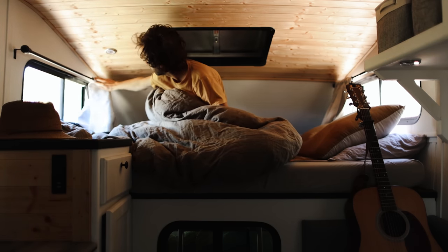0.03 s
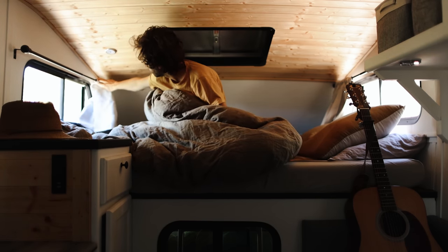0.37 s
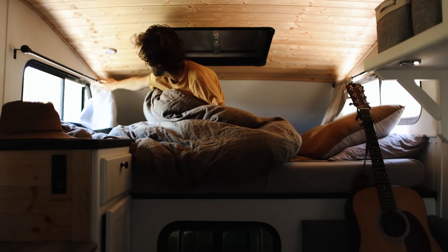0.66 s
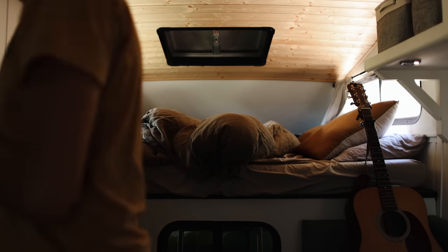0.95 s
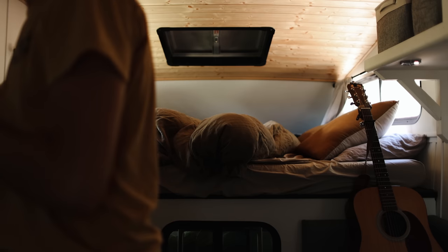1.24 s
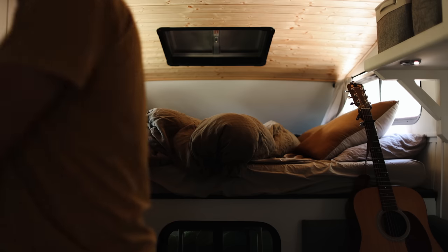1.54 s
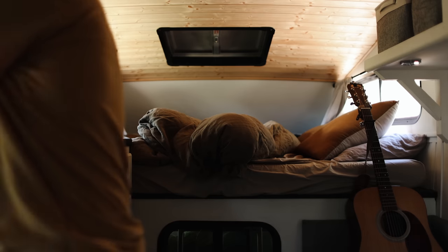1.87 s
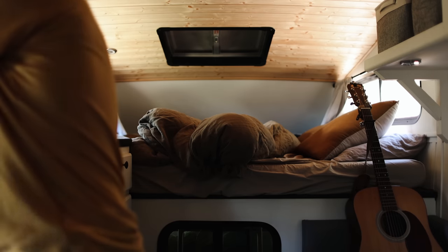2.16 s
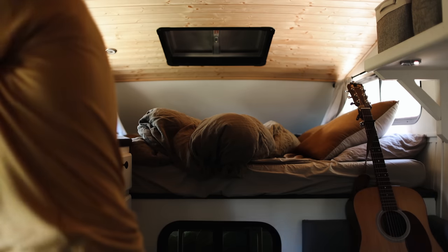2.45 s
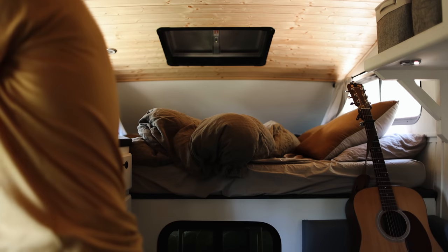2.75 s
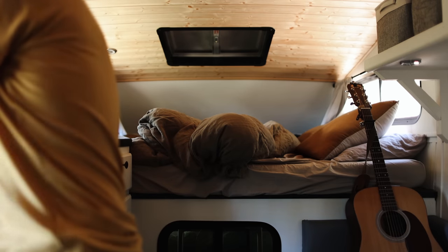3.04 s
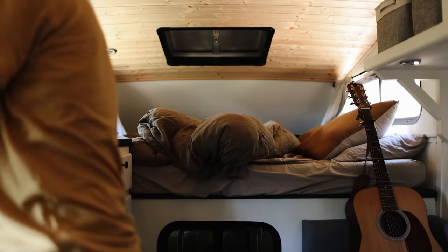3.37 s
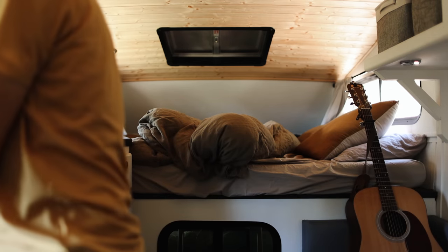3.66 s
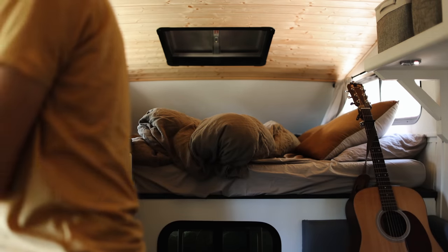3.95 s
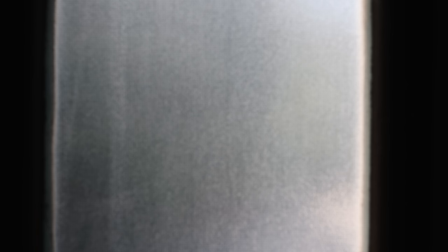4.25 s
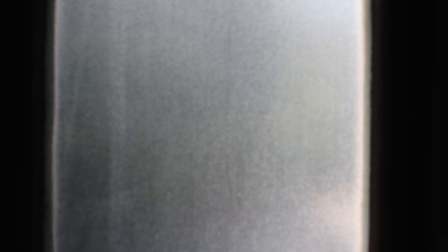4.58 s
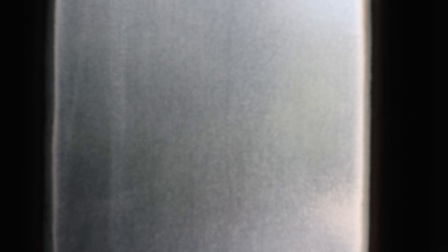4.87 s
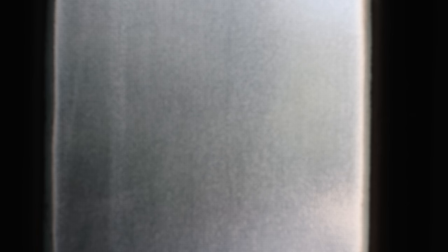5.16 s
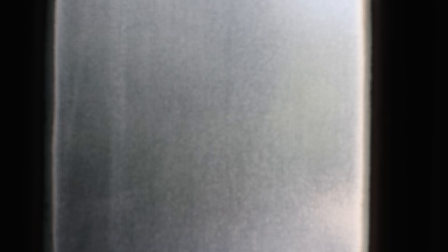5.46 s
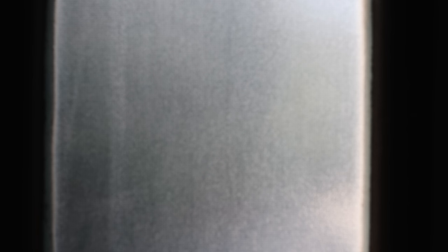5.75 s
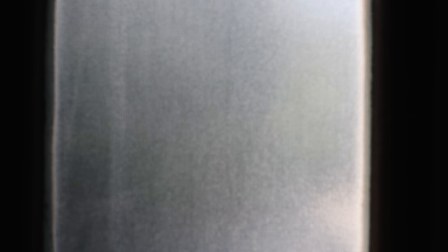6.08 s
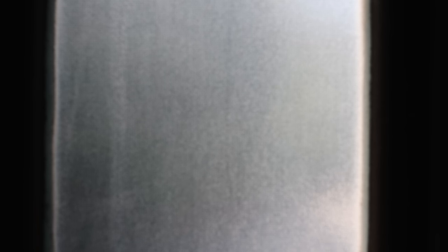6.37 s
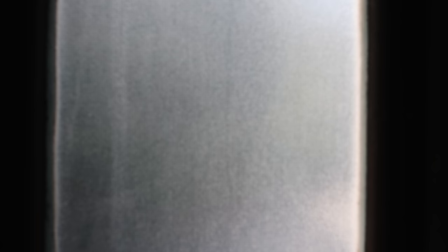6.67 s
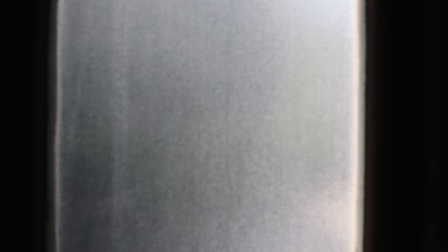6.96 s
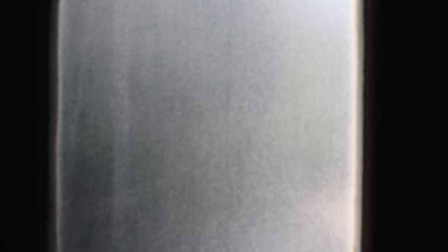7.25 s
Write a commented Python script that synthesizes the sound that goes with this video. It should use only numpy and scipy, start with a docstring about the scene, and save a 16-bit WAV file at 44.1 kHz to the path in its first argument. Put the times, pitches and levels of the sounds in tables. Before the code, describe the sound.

Close by in a small wooden camper, a duvet swishes over a sheet and the bed base thumps softly. A curtain is then hauled along its rail in a run of tugs, the cloth hissing and the gliders scraping, squeaking and knocking against the wall. After a short pause, a door latch is worked several times, clicking and rubbing. Very faint birds sing far outside over quiet cabin air.

```python
"""A curtain is hauled along its rail in a run of tugs, close by in a small wooden camper: the cloth
hisses, the gliders scrape, chirp as they stick and slip, and knock against the wall panel.
Before it, someone shifts in bed: the duvet swishes over the sheet and the bed base thumps softly.
In the quiet afterwards a door latch is worked several times, clicking and rubbing.
Small birds sing far outside, over faint cabin air."""
import sys
import numpy as np
from scipy import signal
from scipy.fft import rfft, irfft, next_fast_len
from scipy.io import wavfile

SR = 44100
rng = np.random.default_rng(int(sys.argv[2]) if len(sys.argv) > 2 else 0)


def wav_out(sig):
    """Save sig, one row per channel (or a flat mono array), as 16-bit PCM at SR to the path in sys.argv[1]."""
    wavfile.write(sys.argv[1], SR, np.round(np.clip(np.atleast_2d(sig).T, -1, 1) * 32767).astype(np.int16))


N = 331632
TIME = np.arange(N) / SR
DUVET_END_S, CURTAIN_END_S = 0.763, 4.308
CUTOFF_HZ = 15800

# tugs: (start [s], end [s], rail scrape [dB], cloth hiss [dB], treble share [dB])
TUGS = [(1.088, 1.174, -65, -66, -18), (1.474, 1.497, -29.5, -51, -24), (1.613, 1.664, -33.5, -53, -10.5),
        (1.711, 1.788, -29.5, -32, -12), (1.83, 1.96, -28, -36, -4), (2.01, 2.213, -33.5, -45, -12),
        (2.075, 2.086, -39, -77.5, -1), (2.216, 2.311, -41.5, -50.5, -13), (2.376, 2.453, -40.5, -48, -14),
        (2.455, 2.508, -30.5, -45, -8.5), (2.674, 2.882, -29.5, -38, -11.5),
        (3.085, 3.176, -27, -39.5, -11), (3.4, 3.444, -38, -52, -5.5), (3.47, 3.816, -33, -41.5, -10.5),
        (3.977, 4.024, -44.5, -66.5, -27)]
# wall shudder as the curtain hits its stop: (start [s], end [s], level [dB])
STOP_SHUDDER = [(3.82, 4.02, -37)]
# wall and mattress rumble, rail scrape, cloth hiss, snapping folds: (frequency [Hz], level [dB])
RUMBLE_SPECTRUM = [(15, -50.5), (25, -15), (37, -2.5), (50, -6), (75, -0.5), (107, 0.5), (139, -3.5),
                   (243, -2), (280, -0.5), (360, -28.5), (620, -120)]
SCRAPE_SPECTRUM = [(130, -29), (220, -4.5), (250, -8), (280, 0), (320, -7.5), (368, 0), (493, -13.5),
                   (595, 2), (660, -11), (786, -0.5), (850, -5.5), (913, -4), (1070, -8), (1220, -8),
                   (1400, -9.5), (3200, -25), (4160, -54.5), (7040, -120)]
CLOTH_SPECTRUM = [(1290, -30.5), (2200, -10.5), (3140, -7.5), (4070, -1.5), (4420, -2.5), (4840, -1.5),
                  (7390, -9), (8580, -11), (12800, -29), (14500, -37.5), (16000, -47.5)]
FOLD_SPECTRUM = [(500, -15), (1100, -0.5), (2200, -1.5), (4500, -1), (8000, -6.5), (12800, -26),
                 (16000, -49)]


def curtain(rise_db_per_s=320.5, coast_db_per_s=264.5, wall_fall_db_per_s=166.5):
    """Each tug scrapes the gliders along the rail and shakes the wall; cloth hisses, folds snap."""
    start, end, scrape_db, hiss_db, treble_db = np.transpose(TUGS)
    rail_gain = strokes(zip(start, end, scrape_db), rise_db_per_s, coast_db_per_s)
    cloth_gain = strokes(zip(start, end, hiss_db), rise_db_per_s, coast_db_per_s)
    wall_gain = strokes(zip(start, end, scrape_db - 2.5), rise_db_per_s, wall_fall_db_per_s)
    stop_gain = strokes(STOP_SHUDDER, rise_db_per_s, wall_fall_db_per_s)
    rumble = np.hypot(wall_gain, stop_gain) * friction(RUMBLE_SPECTRUM, 3000, 4.4, 2.0)
    scrape = rail_gain * near_walls(friction(SCRAPE_SPECTRUM, 4000, 0.86, 1.4), echo_db=-10)
    cloth = near_walls(friction(CLOTH_SPECTRUM, 9000, 2.8, 2.1))
    hiss = cloth_gain * brighten(cloth, np.interp(TIME, (start + end) / 2, treble_db))
    folds = from_db(-1) * cloth_gain * near_walls(friction(FOLD_SPECTRUM, 90, 1, 0.98), echo_db=-5)
    return (rumble + scrape + hiss + folds + glider_chirps()) * between(DUVET_END_S, CURTAIN_END_S)


# runs along the rail: (start [s], end [s], slip rate [1/s], relative level [dB])
GLIDER_RUNS = [(2.085, 2.205, 52, -43), (2.24, 2.425, 28, -44.5), (2.44, 2.515, 50, -43.5),
               (2.63, 2.69, 40, -44), (2.695, 2.915, 60, -37.5), (2.94, 3.045, 26, -47),
               (3.055, 3.205, 48, -38), (3.248, 3.26, 40, -45), (3.39, 3.47, 45, -43),
               (3.48, 3.80, 50, -39.5)]


def glider_chirps(low_hz=3850, high_hz=5950, catch_hz=3800, catch_db=-4.5, spread_db=1.8, jitter=.1):
    """Stick-slip: a rising squeak as a glider lets go, a lower blip as it catches again."""
    out = np.zeros(N)
    for start, end, slips_per_s, db in GLIDER_RUNS:
        for due_s in np.arange(start, end, 1 / slips_per_s):
            late, size, pitch, wait, grip = rng.standard_normal(5)
            slip_s = due_s + jitter * late / slips_per_s
            catch_s = slip_s + (.6 + jitter * wait) / slips_per_s
            detune = 1 + .03 * pitch
            slip = squeak(low_hz * detune, high_hz * detune, length_s=.0028)
            catch = squeak(catch_hz * detune, 1.07 * catch_hz * detune, length_s=.004)
            add(out, slip_s, from_db(db + spread_db * size) * slip)
            add(out, catch_s, from_db(db + catch_db + spread_db * grip) * catch)
    return 3 * np.std(out) * near_walls(rms_one(out), echo_db=-6)


def squeak(low_hz, high_hz, length_s):
    """One tiny upward sine sweep."""
    progress = np.linspace(0, 1, round(length_s * SR))
    hz = low_hz + (high_hz - low_hz) * progress
    envelope = np.sqrt(np.sin(np.pi * progress).clip(0))
    return envelope * np.sin(2 * np.pi * np.cumsum(hz) / SR)


# knocks: (time [s], level [dB], tilt [dB/octave], cut-off [Hz], spot resonance [Hz], spot gain [dB])
GLIDER_KNOCKS = [(1.4083, -43, 2, 5900, 900, -19), (1.437, -44.5, 6, 12300, 900, -13),
                 (1.4579, -33, 5, 6500, 895, -14), (1.5434, -29, -0.5, 12100, 463, 7),
                 (1.691, -29.5, 4, 11000, 3980, 0.5), (1.707, -31.5, 2.5, 8000, 2280, -8),
                 (1.802, -23.5, 5, 6730, 4030, 0), (1.912, -28, 6.5, 8100, 2250, 3),
                 (1.9746, -21.5, 3.5, 11000, 2180, 2), (2.0607, -25, -1.5, 2400, 620, 11.5),
                 (2.4428, -46, 8, 8000, 470, -6), (2.5802, -32.5, 2, 10000, 766, 8.5),
                 (2.645, -20.5, -2, 2013, 464, 6), (2.653, -21, 2, 2500, 905, 9.5),
                 (2.7294, -21, 1.5, 2400, 1200, 5.5), (2.798, -26, -1.5, 3980, 905, 10.5),
                 (2.8995, -16, 0.8, 3630, 463, -4.5), (2.9065, -18.5, -1.5, 2210, 765, 6),
                 (3.0284, -31, -3.5, 5016, 296, -3.5), (3.171, -25.5, 0.5, 1800, 930, 7),
                 (3.2731, -13.5, 0.4, 3850, 925, 3), (3.3518, -34, 0.5, 5000, 905, 4),
                 (3.471, -38, 5, 3000, 1260, -3), (3.506, -39, 5, 2910, 1270, -1.5),
                 (3.6647, -18, 1.5, 2300, 970, -4.5), (3.788, -25.5, -4, 1800, 765, 3),
                 (3.8088, -12.5, 8, 2460, 1300, 0.5), (3.8175, -16, 3.5, 2340, 1740, 4),
                 (3.9021, -37.5, 6, 2800, 1450, 8), (3.984, -36.5, 1, 2210, 1280, 4)]
# wall panel: (frequency [Hz], level [dB], t60 [s])
WALL_MODES = [(88.9, -16.5, 0.12), (157, 2.5, 0.25), (287.3, 1, 0.11), (467, 8, 0.11), (585, -8.5, 0.06),
              (743, 8, 0.054), (780, -8.5, 0.045), (924, 7.5, 0.068), (1280, 2.5, 0.1), (1481, -4.5, 0.091),
              (1676, -4.5, 0.13), (1750, -8, 0.044), (1949, -15, 0.12), (2280, -10.5, 0.04),
              (3900, -11.5, 0.12), (4500, -21, .12)]
# contact on the panel: (frequency [Hz], level [dB])
WALL_CONTACT_SPECTRUM = [(60, 0.5), (150, 1), (900, 5), (1600, 1), (2800, -11), (4300, -8.5), (7000, -16),
                         (9000, -15), (15000, -32)]


def glider_knocks():
    """Gliders knock on the rail and ring the wall panel."""
    return hard_blows(GLIDER_KNOCKS, WALL_CONTACT_SPECTRUM, WALL_MODES,
                      spot_q=11, chatter_s=0.013, cabin_db=-1, ring_db=-2.5)


# clicks: (time [s], level [dB], tilt [dB/octave], cut-off [Hz], spot resonance [Hz], spot gain [dB])
LATCH_CLICKS = [(5.1067, -22, 3, 5200, 525, 11), (5.2673, -51.5, -7.5, 2495, 1100, 15),
                (5.5245, -50, 1, 2194, 548, -2), (5.5633, -40.5, 2.5, 2750, 1090, -4),
                (5.579, -44, 0, 2390, 1080, 25), (5.6093, -29.5, 1.5, 4020, 1100, 0),
                (5.7558, -40, -6.5, 4960, 634, 3.5), (5.783, -48.5, -5, 6050, 548, -7),
                (5.799, -63, 5, 6000, 1630, -12), (5.82, -42.5, -6.5, 3970, 548, -0.5),
                (5.8685, -48, 5.5, 5920, 2410, -6.5), (5.88, -48.5, 8.5, 4000, 2690, 0.5),
                (5.9163, -16.5, 6, 3260, 1484, 0.5), (6.333, -44.5, -6, 12900, 446, 18),
                (6.3771, -51, 5, 5000, 1375, -11), (6.4515, -36, 0.5, 8300, 1100, -6.5),
                (6.4715, -23, 1, 5400, 2080, 14), (6.4742, -22, 2.5, 5500, 675, 5),
                (6.6351, -36, -4, 12000, 458, -3.5), (6.6612, -28.5, 2.5, 2630, 1375, -8.5),
                (6.679, -29, 16, 2800, 2100, 24.5), (6.6839, -16.5, 1.5, 13440, 866, 7.5),
                (6.7005, -30.5, -3.5, 3980, 1340, 2.5), (6.722, -33, -2.5, 2990, 835, 13),
                (6.751, -38, -3, 1990, 840, 4), (6.7774, -36, 4, 3200, 1630, 6),
                (6.817, -45.5, 1, 6200, 1096, -15.5), (7.3207, -41.5, -3, 12900, 480, 10),
                (7.3813, -54.5, 1.5, 8750, 1630, -9), (7.421, -58, 2.5, 4930, 2050, -7)]
# latch and door leaf: (frequency [Hz], level [dB], t60 [s])
LATCH_DOOR_MODES = [(185, -6, 0.2), (300, -6.5, 0.12), (463.5, -11, 0.088), (558, 8, 0.1),
                    (669, 7.5, 0.052), (827, -3.5, 0.086), (1010, 4.5, 0.047), (1173, 8, 0.05),
                    (1364, 8, 0.04), (1657, 4, 0.049), (2050, -3.5, 0.06), (2395, 7, 0.055),
                    (2690, 2, 0.038), (3510, -2, 0.025), (4080, -1.5, 0.064), (4790, -6, 0.08),
                    (6100, 0, 0.049), (6500, -12, 0.12)]
# contact in the latch: (frequency [Hz], level [dB])
LATCH_CONTACT_SPECTRUM = [(60, -11), (230, 0), (340, 3), (560, 0), (950, 1), (1500, -0.5), (2400, -3),
                          (3500, -8.5), (5500, -16), (7500, -13), (10000, -22), (15000, -43)]


def latch_clicks():
    """Short, hard contacts ring the latch and the door leaf."""
    return hard_blows(LATCH_CLICKS, LATCH_CONTACT_SPECTRUM, LATCH_DOOR_MODES,
                      spot_q=18, chatter_s=0.0039, cabin_db=-13, ring_db=-4)


# turns: (start [s], end [s], rub [dB], leaf sway [dB])
HANDLE_TURNS = [(5.532, 5.61, -51.5, -43.5), (5.752, 5.86, -49, -44), (5.885, 5.913, -40, -43),
                (6.428, 6.45, -53, -71), (6.485, 6.586, -42.5, -61), (6.641, 6.777, -45, -44),
                (7.364, 7.47, -81, -78)]
# swaying leaf, rubbing handle: (frequency [Hz], level [dB])
SWAY_SPECTRUM = [(13, -36), (22, 4.5), (43, -13), (87, -5), (118, -12.5), (185, -15.5), (254, -29),
                 (280, -13.5), (360, -58.5), (620, -120)]
RUB_SPECTRUM = [(130, -31), (220, -2), (623, -0.5), (876, -9.5), (1310, -5.5), (1760, -12), (2400, -13.5),
                (3130, -18.5), (5150, -27), (6010, -33.5), (9000, -37.5), (11700, -78), (19800, -120)]
# handle under load: (time [s], pitch [Hz], level [dB])
HANDLE_GROAN = [(6.515, 600, -46), (6.53, 654, -39), (6.55, 732, -42), (6.58, 633, -44), (6.60, 555, -52)]


def door_handle(rise_db_per_s=600.5, rub_fall_db_per_s=275.5, sway_fall_db_per_s=85, jolt_db=-24):
    """The handle rubs and groans, its spring crackles; turns and clicks leave the leaf swaying."""
    start, end, rub_db, sway_db = np.transpose(HANDLE_TURNS)
    push_gain = strokes(zip(start, end, sway_db), rise_db_per_s, sway_fall_db_per_s)
    jolt_gain = from_db(jolt_db) * aftermath(LATCH_CLICKS, sway_fall_db_per_s)
    rub_gain = strokes(zip(start, end, rub_db), rise_db_per_s, rub_fall_db_per_s)
    sway = np.hypot(push_gain, jolt_gain) * friction(SWAY_SPECTRUM, 2300, 0.7, 0.64)
    crackle = .7 * near_walls(friction(RUB_SPECTRUM, 110, 2, 1))
    rub = rub_gain * rms_one(friction(RUB_SPECTRUM, 8000, 1.7, 2.1) + crackle)
    groan = gliding_tone(HANDLE_GROAN) * (1 + .6 * drift(220))
    return sway + rub + groan


# bolt against the leaf: (time [s], peak [dB], cut-off [Hz])
BOLT_SHOVES = [(5.110, -26.5, 233), (5.893, -24, 129.6), (5.924, -28, 210)]
# door leaf: (frequency [Hz], level [dB], t60 [s])
DOOR_LEAF_MODES = [(52, -11, .2), (103, 0, 0.068), (187, 4.5, 0.079)]


def bolt_shoves():
    """The bolt shoves the door leaf, which thuds in its low modes."""
    return padded_blows(BOLT_SHOVES, DOOR_LEAF_MODES, contact_s=0.0078)


# blows on the bed base and floor: (time [s], peak [dB], cut-off [Hz])
BED_THUMPS = [(0.004, -20.5, 406), (0.133, -22, 505), (0.152, -23.5, 330), (0.3, -26.5, 555),
              (0.314, -25.5, 500), (0.340, -23, 500), (0.374, -30.5, 1320), (0.554, -22.5, 1080),
              (0.561, -20.5, 1000), (0.689, -36.5, 218), (0.729, -41, 208), (0.907, -44, 1500),
              (1.021, -37.5, 806), (1.283, -40, 1410), (1.315, -32, 2000), (1.492, -18, 1260),
              (1.511, -19, 121), (3.816, -15.5, 132.3), (3.983, -36, 403), (4.012, -25, 126.5),
              (4.109, -39.5, 98), (4.89, -54.5, 260), (4.925, -49.5, 702), (4.955, -53.5, 600),
              (5.02, -55, 149.4)]
# bed base: (frequency [Hz], level [dB], t60 [s])
BED_BASE_MODES = [(64.3, -12, 0.14), (105, -9.5, 0.16), (160, -15.5, 0.13), (231, -1, 0.12),
                  (387, 1.5, 0.035), (500, 1.5, 0.047), (642, 2, 0.036), (784, 1.5, 0.055),
                  (976, -3.5, 0.04)]


def bed_thumps():
    """Soft blows ring the plywood bed base."""
    return padded_blows(BED_THUMPS, BED_BASE_MODES, contact_s=0.0048)


# sweeps over the sheet: (start [s], end [s], level [dB])
DUVET_SWEEPS = [(0.08, 0.36, -42.5), (0.71, 0.76, -45.5)]
# duvet swish: (frequency [Hz], level [dB])
DUVET_SPECTRUM = [(210, -9), (350, -1), (1060, 3), (1140, 5), (1380, 3.5), (2840, -1.5), (3900, -0.5),
                  (4350, -0.5), (4750, -4.5), (5660, -9.5), (6970, -11.5), (12200, -36), (16000, -55)]


def bedding(top_treble_db=-2, treble_db_per_db=1.5, mattress_db=-18.5):
    """The duvet slides over the sheet, brighter when faster; the mattress stirs after each thump."""
    speed = strokes(DUVET_SWEEPS, rise_db_per_s=81, fall_db_per_s=39)
    treble_db = top_treble_db + treble_db_per_db * 20 * np.log10(speed / speed.max())
    swish = speed * brighten(friction(DUVET_SPECTRUM, 15000, 0.48, 0.1), treble_db)
    stir_gain = from_db(mattress_db) * aftermath(BED_THUMPS, fall_db_per_s=74)
    mattress = stir_gain * friction(RUMBLE_SPECTRUM, 3400, 5.0, 0.77)
    return (swish + mattress) * between(-1, DUVET_END_S)


# song syllable: (time from its start [s], pitch [Hz], relative level [dB])
SONG_SYLLABLE = [(0, 3050, -2), (.012, 3600, 2.5), (.021, 4400, 2), (.028, 5100, -2), (.035, 5380, .5),
                 (.043, 5500, .5), (.053, 5400, -2), (.061, 4950, -9), (.069, 4650, .5), (.082, 4280, .5)]
# single far calls: (time [s], pitch [Hz], level [dB])
SLURRED_CALL = [(4.49, 3380, -73), (4.53, 3590, -67.5), (4.555, 3400, -67), (4.575, 3230, -69),
                (4.62, 3110, -73)]
TWO_TONE_CALL = [(4.99, 2700, -80), (5.018, 2660, -76), (5.024, 2350, -74), (5.09, 2340, -75)]
LOWER_CALL = [(4.45, 1310, -78), (4.53, 1340, -76), (4.62, 1390, -77), (4.69, 1420, -70.5),
              (4.72, 1380, -78)]


def birds(song_start_s=6.832, period_s=.0809, song_db=-68.5, step_db=-.8, flutter_db=2.5):
    """One bird repeats a fading syllable, others call once; distance makes them flutter and echo."""
    song = sum(from_db(song_db + k * step_db) * gliding_tone(SONG_SYLLABLE, song_start_s + k * period_s)
               for k in range(8))
    calls = sum(gliding_tone(call) for call in (SLURRED_CALL, TWO_TONE_CALL, LOWER_CALL))
    chorus = (song + calls) * from_db(flutter_db * drift(220))
    return np.std(chorus) * near_walls(rms_one(chorus), echo_db=-2, t60_s=.12)


# background by the door: (time [s], level [dB])
DOOR_AIR_LEVELS = [(4.31, -65), (4.75, -65), (5.35, -68), (6.3, -67.5), (6.75, -61.5), (7.15, -65.5),
                   (7.4, -61)]
# cabin background: (frequency [Hz], level [dB])
AIR_SPECTRUM = [(30, -10), (65, 2), (130, -3), (300, -4.5), (1000, -9.5), (2000, -15), (4500, -19),
                (8000, -24.5), (12000, -32), (15000, -53)]


def cabin_air(early_db=-56):
    """Faint background noise, louder until 4.3 s, where it drops, and louder again as the door comes ajar."""
    by_door_db = np.interp(TIME, *np.transpose(DOOR_AIR_LEVELS))
    db = np.where(TIME < CURTAIN_END_S, early_db, by_door_db)
    return from_db(db) * rms_one(colour(rng.standard_normal(N), AIR_SPECTRUM))


# cabin reverberation: (frequency [Hz], t60 [s])
CABIN_DECAY = [(100, 0.22), (260, 0.24), (700, 0.15), (2000, 0.12), (5000, 0.15), (14000, 0.03)]


def cabin_tail(t):
    """Dense reflections between close walls; the lows last longest."""
    edges_hz = np.geomspace(45, 17000, 9)
    tail = np.zeros(len(t))
    for low_hz, high_hz in zip(edges_hz, edges_hz[1:]):
        band = butter(rng.standard_normal(len(t)), [low_hz, high_hz], "band")
        t60_s = at_hz(CABIN_DECAY, np.sqrt(low_hz * high_hz))
        tail += band * from_db(-60 * t / t60_s)
    return tail


def near_walls(x, echo_db=-3, t60_s=0.037):
    """Direct sound plus first reflections in the narrow cabin; rms 1."""
    t = np.arange(SR // 10) / SR
    echoes = rng.standard_normal(len(t)) * from_db(-60 * t / t60_s) * (t > .002)
    return rms_one(x + from_db(echo_db) * rms_one(signal.fftconvolve(x, echoes)[:N]))


def hard_blows(rows, contact_spectrum, modes, spot_q, chatter_s, cabin_db, ring_db):
    """Contact chatter, body modes and cabin tail; the spot struck favours one resonance."""
    out, t = np.zeros(N), np.arange(SR // 3) / SR
    ends_hz = np.array([60, 16000])
    hardest_db = max(row[1] for row in rows)
    for s, db, tilt_db_per_octave, cut_hz, spot_hz, spot_db in rows:
        settle_s = chatter_s * from_db(-0.17 * (db - hardest_db))   # longer for quieter blows
        chatter = rng.standard_normal(len(t)) * np.exp(-t / settle_s)
        contact = colour(chatter + from_db(cabin_db) * cabin_tail(t), contact_spectrum)
        sound = rms_one(contact) + from_db(ring_db) * rms_one(ringing(modes, t))
        spot = signal.lfilter(*signal.iirpeak(spot_hz, spot_q, fs=SR), sound)
        ends_db = tilt_db_per_octave * np.log2(ends_hz / ends_hz[0])   # light parts tilt it up
        sound = colour(sound + from_db(spot_db) * spot, list(zip(ends_hz, ends_db)))
        sound = butter(sound, min(cut_hz, CUTOFF_HZ), "low", order=3)   # soft contacts dull it
        add(out, s, from_db(db) * sound / np.std(sound[:SR // 50]))
    return out


def padded_blows(rows, modes, contact_s, ring_db=8):
    """A dull scuff that sets the plywood ringing low."""
    out, t = np.zeros(N), np.arange(SR // 3) / SR
    for s, db, cut_hz in rows:
        contact = np.exp(-t / contact_s)
        scuff = butter(rng.standard_normal(len(t)), [90, 1000], "band", order=3) * t * contact
        ring = ringing(modes, t) * (1 - contact)
        sound = butter(rms_one(scuff) + from_db(ring_db) * rms_one(ring), cut_hz, "low", order=3)
        add(out, s, from_db(db) * sound / np.max(np.abs(sound)))
    return out


def ringing(modes, t):
    """Damped sines, each struck with its own strength and sign."""
    hz, db, t60_s = np.transpose(modes)[:, :, None]
    strength = rng.choice([-1, 1], hz.shape) * from_db(db + rng.normal(0, 2, hz.shape))
    return np.sum(strength * from_db(-60 * t / t60_s) * np.sin(2 * np.pi * hz * t), axis=0)


def friction(spectrum, slips_per_s, spread_db, clump_db):
    """Many tiny slips of uneven size, coming in clumps; rms 1."""
    sizes = rng.standard_normal(N) * from_db(spread_db * np.clip(rng.standard_normal(N), -2, 2))
    slips = sizes * (rng.random(N) < slips_per_s / SR) * from_db(clump_db * drift(70))
    return rms_one(colour(slips, spectrum))


def brighten(x, treble_db):
    """Set the share of a hiss that lies above 8 kHz."""
    treble = signal.sosfiltfilt(signal.butter(2, 8000, "high", fs=SR, output="sos"), x)
    share = np.minimum(from_db(treble_db), .9)
    return rms_one(x - treble) * np.sqrt(1 - share ** 2) + rms_one(treble) * share


def gliding_tone(rows, delay_s=0):
    """A sine through points (time [s], pitch [Hz], level [dB])."""
    s, hz, db = np.transpose(rows)
    t = np.arange(s[0], s[-1], 1 / SR)
    phase = 2 * np.pi * np.cumsum(np.interp(t, s, hz)) / SR
    envelope = from_db(np.interp(t, s, db)) * signal.windows.tukey(len(t), .15)
    out = np.zeros(N)
    add(out, s[0] + delay_s, envelope * np.sin(phase))
    return out


def strokes(rows, rise_db_per_s, fall_db_per_s):
    """Gain of movements (start [s], end [s], level [dB]) that swell, hold and die away."""
    power = 0
    for start, end, db in rows:
        loss_db = rise_db_per_s * np.maximum(start - TIME, 0) + fall_db_per_s * np.maximum(TIME - end, 0)
        power = power + from_db(db - np.minimum(loss_db, 100)) ** 2
    return np.sqrt(power)


def aftermath(hits, fall_db_per_s):
    """Gain of a motion that starts at each hit and dies away."""
    return strokes([(s, s, db) for s, db, *_ in hits], 9000, fall_db_per_s)


def between(start_s, end_s, ramp_s=.004):
    """Gate with short ramps."""
    return np.clip((TIME - start_s) / ramp_s, 0, 1) * np.clip((end_s - TIME) / ramp_s, 0, 1)


def drift(changes_per_s):
    """Slow random wander; rms 1."""
    knots = rng.standard_normal(4000)
    return rms_one(np.interp(TIME * changes_per_s, np.arange(len(knots)), knots))


def colour(x, spectrum):
    """Minimum-phase filter with this spectrum, falling steeply past its ends."""
    size = 2 * next_fast_len(len(x) // 2 + 4096)
    hz = np.maximum(np.fft.rfftfreq(size, 1 / SR), 1)
    octaves_outside = np.abs(np.log2(hz / np.clip(hz, spectrum[0][0], spectrum[-1][0])))
    gain_db = at_hz(spectrum, hz) - np.minimum(30 * octaves_outside, 70)
    cepstrum = irfft(np.log(from_db(gain_db)))
    cepstrum[1:size // 2] *= 2
    cepstrum[size // 2 + 1:] = 0
    return irfft(rfft(x, size) * np.exp(rfft(cepstrum)))[:len(x)]


def butter(x, hz, kind, order=2):
    """Causal Butterworth filter."""
    return signal.sosfilt(signal.butter(order, hz, kind, fs=SR, output="sos"), x + 1e-18)


def at_hz(points, hz):
    """Read a table on a log-frequency axis."""
    table_hz, values = np.transpose(points)
    return np.interp(np.log(np.maximum(hz, 1)), np.log(table_hz), values)


def add(track, s, sound):
    """Mix a sound in at time s."""
    start = max(round(s * SR), 0)
    track[start:start + len(sound)] += sound[:max(N - start, 0)]


def from_db(db):
    """Decibels to gain."""
    return 10 ** (np.asarray(db) / 20)


def rms_one(x):
    """Scale to rms 1."""
    return x / np.sqrt(np.mean(x ** 2) + 1e-20)


def scene():
    """All sources in the one small cabin, mono."""
    impacts = glider_knocks() + latch_clicks() + bed_thumps() + bolt_shoves()
    rubbing = bedding() + curtain() + door_handle()
    return (impacts + rubbing + cabin_air() + birds())[None]


def record(dry):
    """Round the highest peaks and cut the top."""
    rounded = dry / (1 + dry ** 8) ** (1 / 8)
    return butter(rounded, CUTOFF_HZ, "low", order=20)


dry = scene()
out = record(dry)
wav_out(out)
```